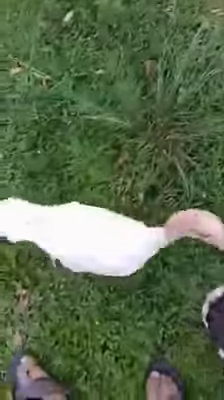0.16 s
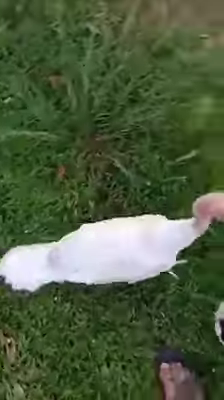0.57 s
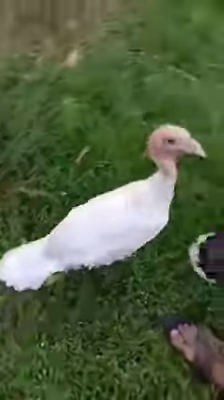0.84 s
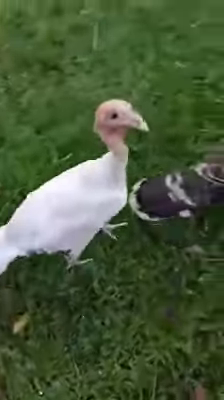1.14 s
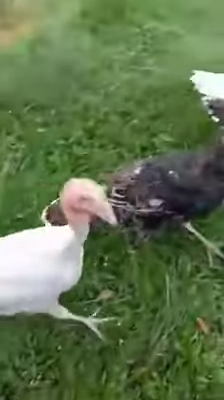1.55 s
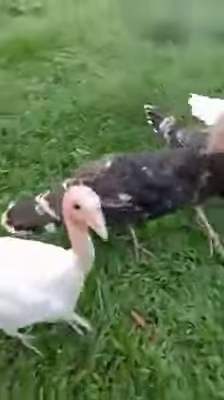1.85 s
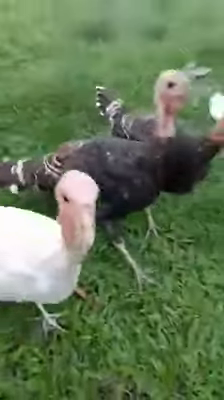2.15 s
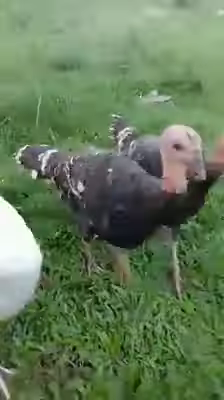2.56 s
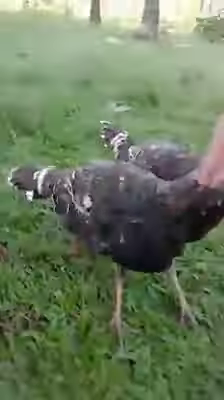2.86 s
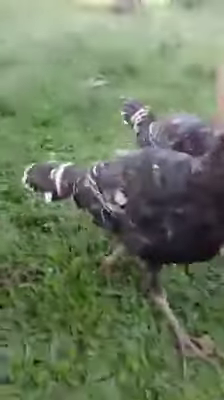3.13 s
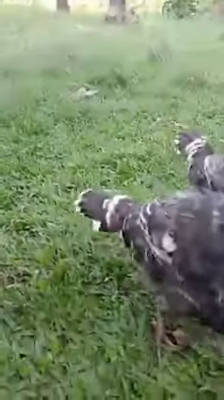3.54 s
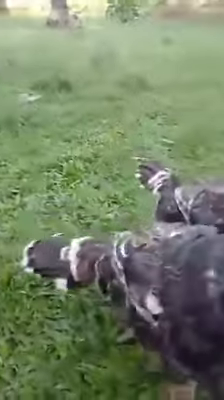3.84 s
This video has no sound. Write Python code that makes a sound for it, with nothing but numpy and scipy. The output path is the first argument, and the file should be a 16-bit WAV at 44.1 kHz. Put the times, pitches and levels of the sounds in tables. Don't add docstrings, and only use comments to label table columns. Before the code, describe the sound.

A young turkey gives thin whistles, then a run of short, cracking yelps over grassy footsteps.

```python
import sys
import numpy as np
from scipy import signal
from scipy.fft import rfft, irfft
from scipy.io import wavfile
from scipy.ndimage import uniform_filter1d

SR = 44100
rng = np.random.default_rng(int(sys.argv[2]) if len(sys.argv) > 2 else 0)


def volts(x):
    e = np.asarray(x, float) / 20
    return 10 ** e


def dump_mix(stems):
    frames = np.atleast_2d(stems).T
    limited = np.clip(frames, -1, 1)
    pcm = np.round(limited * 32767).astype(np.int16)
    wavfile.write(sys.argv[1], SR, pcm)


N = 176400

# time in seconds, level in dB.
MEADOW_LEVEL = [(0, -51), (1.898, -48), (4, -57)]
# centre in Hz, width in Hz, level in dB.
INSECT_BANDS = [(6134, 630, -5.5), (9920, 1340, -9), (1280, 77, -10.5)]
# frequency in Hz, density in dB.
AIR_SPECTRUM = [(300, -1), (2000, -2), (4800, 0.5), (5400, -18), (12000, -34)]
# frequency in Hz, density in dB.
BREEZE_SPECTRUM = [(45, -21), (75, -10), (130, 5.5), (180, -3.5), (260, -21), (500, -47.5)]
# time in seconds, level in dB.
GUSTS = [(0.0, -54), (0.11, -61.5), (0.52, -48), (0.56, -41.5), (0.67, -55), (0.75, -48), (1.26, -58.5),
         (1.3, -48.5), (2.7, -54.5), (2.71, -49.5), (2.97, -49), (3.09, -47.5), (3.16, -47.5), (3.32, -40),
         (3.34, -49.5), (3.61, -49), (3.68, -50), (4.0, -59.5)]
# start in seconds, pitch in Hz, level in dB, length in seconds.
HAND_BUMPS = [
    (0.525, 83.3, -37, 0.11),
    (.73, 186, -38, 0.08),
    (3.184, 110, -48, 0.37),
]
# start in seconds, length in seconds, first and last pitch in Hz, level in dB.
PEEPS = [(.045, .07, 4380, 4330, -53), (.105, .03, 4300, 4050, -52), (.3, .14, 3600, 3800, -57),
         (.56, .09, 3450, 3380, -50), (.015, .04, 5100, 5080, -60), (.045, .03, 950, 980, -62),
         (.09, .06, 1000, 1060, -61), (.33, .03, 3300, 3330, -62), (.39, .05, 3420, 3250, -59),
         (.645, .055, 3650, 3800, -57), (.66, .05, 3400, 3380, -60), (.63, .09, 1200, 1130, -57),
         (.82, .015, 3500, 3850, -50), (.96, .05, 3800, 3780, -58), (1.275, .05, 3800, 3800, -54),
         (1.395, .04, 3700, 3900, -50), (1.59, .04, 510, 500, -50), (2.93, .05, 520, 520, -52),
         (.827, .14, 3830, 3780, -48), (1.022, .02, 2850, 3150, -53), (1.036, .017, 3100, 3750, -50),
         (1.073, .032, 3150, 2550, -48), (1.115, .025, 2400, 3050, -48), (1.138, .025, 3050, 2450, -48),
         (1.11, .14, 3820, 3780, -48), (1.6, .06, 4330, 4280, -52), (1.42, .12, 3870, 3820, -38),
         (1.56, .016, 4000, 4420, -44), (1.568, .045, 4420, 4300, -42), (1.645, .085, 4300, 3820, -45),
         (1.425, .085, 3150, 2860, -42)]
# start in seconds, length in seconds, level in dB.
FOOT_SWISHES = [
    (0.245, 0.16, -62.5),
    (0.846, 0.62, -50.5),
    (1.645, 0.43, -40.5),
    (1.924, 0.12, -50.5),
    (2.158, 0.36, -42),
    (2.502, 0.12, -38),
    (2.844, 0.18, -49),
    (3.197, 0.24, -46.5),
    (3.487, 0.18, -65),
    (3.946, 0.1, -48),
]
# frequency in Hz, density in dB.
GRASS_SPECTRUM = [(500, -29), (1300, -2.5), (3300, -11), (8000, -18), (12000, -29), (14500, -14.5)]
# time in seconds, peak level in dB.
SNAPS = [
    (0.492, -38),
    (2.562, -21.5),
]
# frequency in Hz, level in dB, 60 dB decay time in seconds.
SNAP_MODES = [(1280, 13, 0.031), (2025, 20, 0.018), (4070, 5.5, 0.016), (7340, 6, 0.0037)]
# start in seconds, length in seconds, level in dB.
CATCHES = [
    (1.239, 0.023, -33),
    (1.539, 0.039, -28),
    (1.663, 0.017, -48),
    (2.68, .035, -27.5),
    (2.982, 0.042, -35),
    (3.868, .03, -43.5),
]
# time in seconds, pitch in Hz, level in dB.
EARLY_WHISTLES = [
    [(1.256, 1850, -33), (1.285, 1920, -34), (1.315, 2070, -50), (1.35, 2010, -35), (1.364, 1843, -30),
     (1.424, 1810, -33), (1.436, 1563, -40.5), (1.465, 1480, -32), (1.508, 1413, -48)],
    [(1.552, 1485, -39), (1.559, 1660, -29), (1.566, 2146, -20), (1.582, 2202, -19), (1.606, 2060, -29.5),
     (1.625, 1967, -21), (1.656, 1832, -22.5)],
]
LATE_WHISTLES = [
    [(3.74, 1709, -19.5), (3.78, 1741, -18.5), (3.864, 1842, -17)],
    [(3.975, 1320, -39), (3.99, 1823, -24), (3.9999, 1878, -15)],
]
# start in seconds, length in seconds, first and last pitch in Hz, level in dB.
YELP_NOTES = [(1.99, 0.037, 1920, 1843, -14.5), (2.098, 0.017, 1746, 2026, -15),
              (2.111, 0.016, 2410, 2330, -19), (2.354, 0.02, 2120, 1740, -17.5),
              (2.453, 0.022, 1660, 1914, -21), (2.68, 0.021, 1656, 1900, -23),
              (2.783, 0.024, 1865, 1916, -18.5), (2.802, 0.011, 2400, 2150, -21),
              (2.998, 0.033, 1960, 1810, -19.5), (3.104, .029, 1860, 2000, -19),
              (3.318, .034, 1700, 1920, -17), (3.422, .022, 1700, 2050, -17),
              (3.436, 0.02, 2060, 1724, -21.5), (3.38, 0.071, 2086, 1940, -26),
              (1.654, 0.011, 2920, 2630, -34.5), (3.638, 0.026, 1670, 1790, -12.5),
              (3.862, 0.014, 2030, 2540, -26), (1.546, 0.013, 955, 836, -26.5),
              (1.654, 0.014, 1440, 1370, -28.5)]
# time in seconds, pitch in Hz, level in dB, octave level in dB.
EARLY_YELPS = [
    [(2.022, 1489, -29, -37), (2.036, 1403, -21, -22), (2.065, 1370, -20, -25.5),
     (2.092, 1357, -17.5, -28.5), (2.102, 1380, -24, -36)],
    [(2.372, 1391, -23, -41), (2.39, 1320, -18, -31.5), (2.412, 1159, -26.5, -23.5),
     (2.448, 1098, -33, -15.5), (2.466, 1273, -20.5, -37)],
    [(2.702, 1297, -25.5, -39), (2.718, 1153, -20, -18), (2.755, 1079, -23, -32), (2.778, 1064, -23.5, -21),
     (2.797, 1303, -21, -29)],
]
LATE_YELPS = [
    [(3.01, 1254, -31, -39), (3.03, 1269, -18.5, -35.5), (3.042, 1127, -18, -25), (3.094, 1073, -27.5, -19),
     (3.114, 1270, -13.5, -35.5)],
    [(3.338, 1327, -25.5, -70), (3.358, 1141, -20, -20.5), (3.412, 1097, -22.5, -27),
     (3.428, 1233, -18.5, -23), (3.442, 1300, -35.5, -67)],
    [(3.66, 1422, -19.5, -34.5), (3.694, 1346, -14, -54), (3.703, 1120, -28.5, -30),
     (3.722, 1040, -23, -22.5), (3.733, 1104, -26, -27), (3.745, 1280, -25, -50.5)],
]
YELP_ROUGHNESS = [.04, .35, .2, .18, .22, .1]
HALF_LINE_DB = [-42, -33, -28, -29, -29, -34]
# multiple of the pitch, level in dB relative to the octave.
OVER_OCTAVE = [(3, -21), (4, -28), (5, -44)]
# multiple of the pitch, level in dB relative to the half-line.
OVER_HALF = [(.5, -10), (2.5, -16), (3.5, -23), (4.5, -25)]
# centre in Hz, width in Hz, level in dB.
RASP_LOW = [(1800, 1100, 0), (3000, 900, -5)]
RASP_HIGH = [(4650, 400, -24), (8200, 1800, -34), (13200, 1800, -38)]


def rms_one(x):
    return x / np.sqrt(np.mean(x ** 2) + 1e-20)


def drift(rate_hz):
    r = np.exp(-2 * np.pi * rate_hz / SR)
    settled = signal.lfilter([1], [1, -2 * r, r * r], rng.standard_normal(N + SR))[SR:]
    return rms_one(settled)


def coloured(x, points):
    hz, db = np.transpose(points)
    f = np.arange(N // 2 + 1) * SR / N + 1
    shape_db = np.interp(np.log(f), np.log(hz), db)
    below_first_db = 21 * np.log(np.maximum(hz[0] / f, 1))
    return rms_one(irfft(rfft(x) * volts(shape_db - below_first_db), N))


def resonate(x, hz, width_hz):
    r = np.exp(-np.pi * width_hz / SR)
    poles = [1, -2 * r * np.cos(2 * np.pi * hz / SR), r * r]
    return signal.lfilter([(1 - r * r) / 2, 0, (r * r - 1) / 2], poles, x + 1e-18)


def noise_band(noise, hz, width_hz):
    return rms_one(resonate(resonate(noise, hz, width_hz), hz, width_hz))


def window(start, length, rise, fall):
    i = np.arange(int(start * SR), min(N, int((start + length) * SR)))
    t = i / SR - start
    ramp = np.clip(np.minimum(t / rise, (length - t) / fall), 0, 1)
    return i, np.sin(np.pi / 2 * ramp) ** 2


def patchy(x, depth_db):
    f, spectrum = np.arange(N // 2 + 1) * SR / N, rfft(x)
    edges = [0, *np.geomspace(400, 5600, num=15), SR]
    out = np.zeros(N)
    for low, high in zip(edges, edges[1:]):
        band = irfft(spectrum * (f >= low) * (f < high), N)
        out += volts(depth_db * drift(4)) * band
    return rms_one(out)


def meadow():
    s, db = np.transpose(MEADOW_LEVEL)
    level = np.interp(np.arange(N) / SR, s, db)
    song = np.zeros(N)
    for hz, width_hz, band_db in INSECT_BANDS:
        song += volts(band_db + 1.3 * drift(25)) * noise_band(rng.standard_normal(N), hz, width_hz)
    air_level = volts(-55 + 0.2 * (level - level[0]) + 2 * drift(5.0))
    air = air_level * patchy(coloured(rng.standard_normal(N), AIR_SPECTRUM), depth_db=3)
    return volts(level) * song + air


def breeze():
    gust_db = np.interp(np.arange(N) / SR, *np.transpose(GUSTS))
    out = volts(gust_db + drift(10)) * coloured(rng.standard_normal(N), BREEZE_SPECTRUM)
    for s, hz, db, length in HAND_BUMPS:
        i, env = window(s, length, 0.36 * length, 0.81 * length)
        out[i] += volts(db) * env * np.sin(2 * np.pi * hz * (i / SR - s))
    return out


def gliding_notes(table, rise, fall, rough, wobble, octave_db):
    out = np.zeros(N)
    for s, length, from_hz, to_hz, db in table:
        i, env = window(s, length, min(rise, length / 2), min(fall, length / 2))
        pitch = np.linspace(from_hz, to_hz, len(i)) * (1 + rough * wobble[0, i] / 20)
        phase = 2 * np.pi * np.cumsum(pitch) / SR
        tone = np.sin(phase) + volts(octave_db) * np.sin(2 * phase)
        out[i] += volts(db) * env * (1 + rough * wobble[1, i]) * tone
    return out


def peeps(wobble):
    return 1.5 * gliding_notes(PEEPS, .012, .012, .18, wobble, octave_db=-40)


def grass():
    blades_per_s = 5500
    struck = rng.random(N) < blades_per_s / SR
    blades = struck * volts(1.4 * rng.exponential(1, N)) * rng.choice([-1, 1], N)
    env = np.zeros(N)
    for s, length, db in FOOT_SWISHES:
        i, shape = window(s, length, 0.21 * length, 0.74 * length)
        env[i] += volts(db) * shape
    return env * volts(4.6 * drift(11.2)) * coloured(blades, GRASS_SPECTRUM)


def snaps():
    clicks = np.zeros(N)
    for s, db in SNAPS:
        clicks[int(s * SR)] = volts(db - 17)
    out = np.zeros(N)
    for hz, db, t60 in SNAP_MODES:
        r, w = volts(-60 / (t60 * SR)), 2 * np.pi * hz / SR
        out += volts(db) * signal.lfilter([0, np.sin(w)], [1, -2 * r * np.cos(w), r * r], clicks + 1e-18)
    return out


def voice(rows, rough, partials, wobble):
    s, hz, *levels = np.transpose(rows)
    i, env = window(s[0] - .004, s[-1] - s[0] + .008, .008, .007)
    pitch = np.interp(i / SR, s, hz) * (1 + rough * wobble[0, i] / 20)
    phase = 2 * np.pi * np.cumsum(pitch) / SR
    gains = [volts(np.interp(i / SR, s, db) + 4) * env for db in levels]
    out = np.zeros(N)
    for k, (multiple, column, db) in enumerate(partials):
        shake = 1 + rough * wobble[1 + k % 2, i]
        out[i] += gains[column] * volts(db) * shake * np.cos(multiple * phase + k / 2)
    return out


def whistles(wobble):
    partials = [(1, 0, 0), (2, 0, -38)]
    return sum(voice(rows, .02, partials, wobble) for rows in [*EARLY_WHISTLES, *LATE_WHISTLES])


def breath_rasp():
    white = rng.standard_normal(N)
    low = sum(volts(db) * noise_band(white, hz, width) for hz, width, db in RASP_LOW)
    edge = signal.cheby2(8, 50, 3600 * 1.1, fs=SR, output="sos")
    high = sum(volts(db) * noise_band(white, hz, width) for hz, width, db in RASP_HIGH)
    return signal.sosfilt(edge, low) + high


def yelps(wobble, opening):
    # multiple of the pitch, level track (0 low voice, 1 octave, 2 half-line), dB
    partials = [(1, 0, 0), (2, 1, 0), (1.5, 2, 0)]
    partials += [(m, 1, db) for m, db in OVER_OCTAVE]
    partials += [(m, 2, db) for m, db in OVER_HALF]
    rasp = breath_rasp()
    out = np.zeros(N)
    for s, length, db in CATCHES:
        i, env = window(s, length, length / 2, length / 2)
        out[i] += volts(db) * env * rasp[i]
    breath_power = .12 * opening ** 2
    for rows, rough, half_db in zip(EARLY_YELPS + LATE_YELPS, YELP_ROUGHNESS, HALF_LINE_DB):
        lowest = min(row[1] for row in rows)
        tracks = [(*row, half_db - 60 * np.log2(row[1] / lowest)) for row in rows]
        tone = voice(tracks, rough, partials, wobble)
        out += tone
        breath_power = breath_power + rough * tone ** 2
    breath = np.sqrt(np.abs(uniform_filter1d(breath_power, size=200)))
    return out + volts(-5) * breath * rasp


def outdoors(x):
    t60_s = .5
    t = np.arange(SR // 2) / SR
    tail = volts(-49 - 60 * t / t60_s) * rng.standard_normal(len(t))
    return signal.fftconvolve(x, tail)[:N]


def ducking(loud):
    threshold_db, share, recover_db_per_s = -33, .6, 250
    level_db = 10 * np.log10(uniform_filter1d(loud ** 2, size=512) + 1e-12)
    over = np.maximum(level_db - threshold_db, 0)
    ramp = recover_db_per_s * np.arange(N) / SR
    held = np.maximum.accumulate(over + ramp) - ramp
    return volts(-share * uniform_filter1d(held, size=512))


def scene():
    wobble = np.array([drift(360), drift(120), drift(130)])
    opening = gliding_notes(YELP_NOTES, .015, .006, .13, wobble, octave_db=-32)
    near = yelps(wobble, opening) + whistles(wobble) + opening
    birds = near + peeps(wobble) + snaps()
    background = grass() + meadow() + breeze()
    return (birds + outdoors(birds) + ducking(near) * background)[None]


def low_pass(x):
    return signal.sosfilt(signal.butter(12, 16120, fs=SR, output="sos"), x)


def record(dry):
    steep = signal.cheby2(10, 60, 16100, fs=SR, output="sos")
    dipped = dry - resonate(dry, 5350, 500)
    return low_pass(signal.sosfilt(steep, dipped))


dry = scene()
out = record(dry)
dump_mix(out)
```